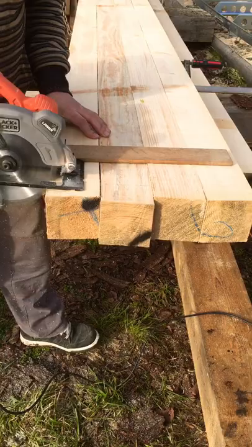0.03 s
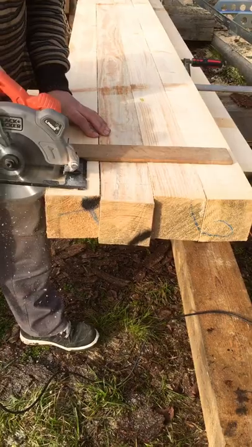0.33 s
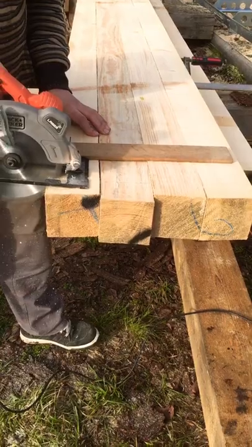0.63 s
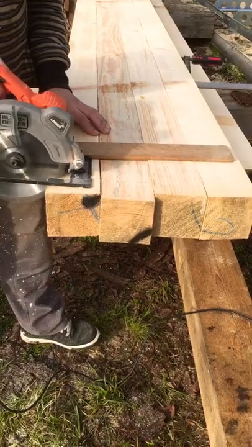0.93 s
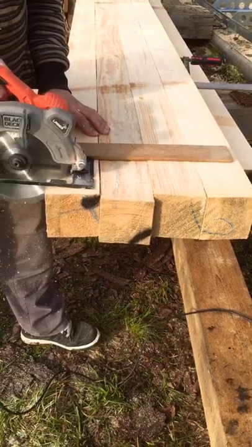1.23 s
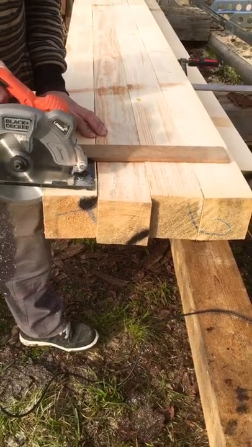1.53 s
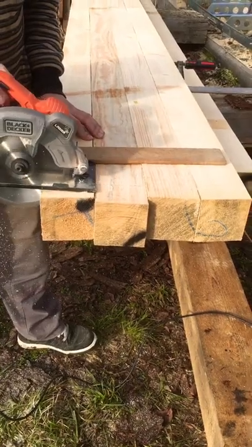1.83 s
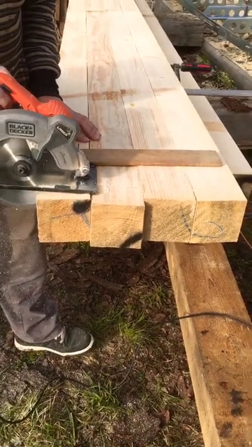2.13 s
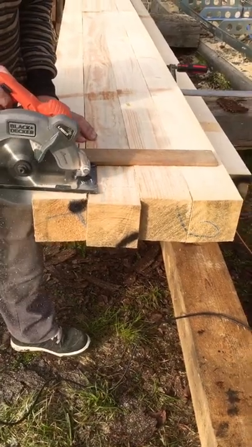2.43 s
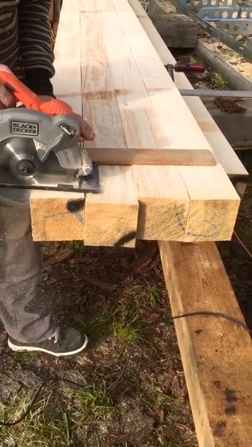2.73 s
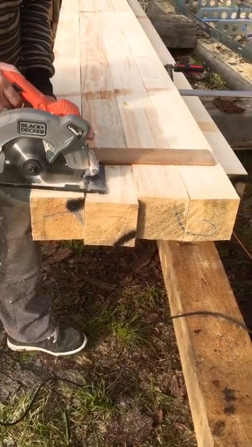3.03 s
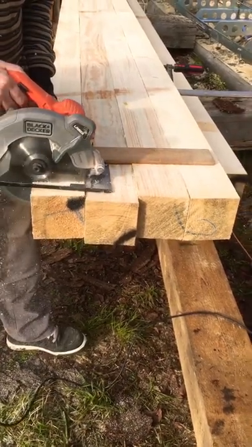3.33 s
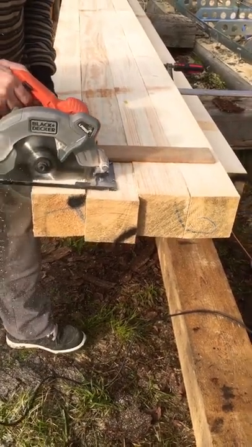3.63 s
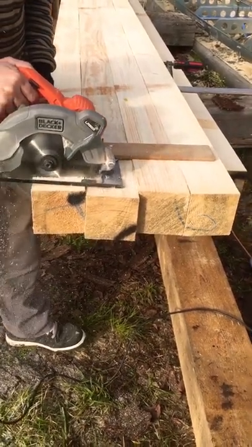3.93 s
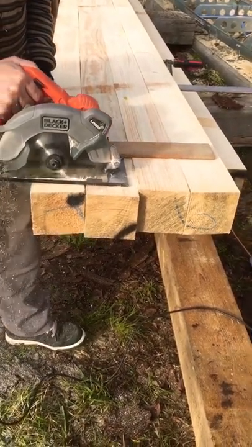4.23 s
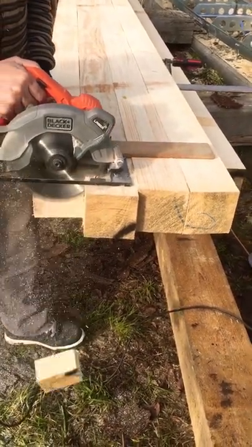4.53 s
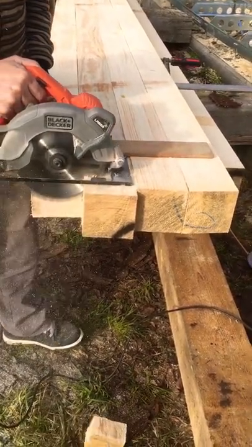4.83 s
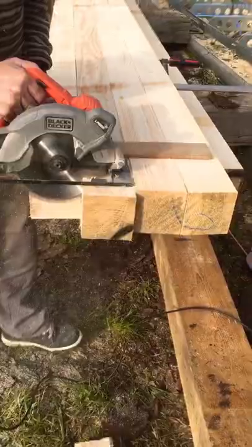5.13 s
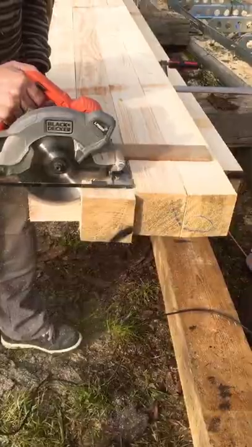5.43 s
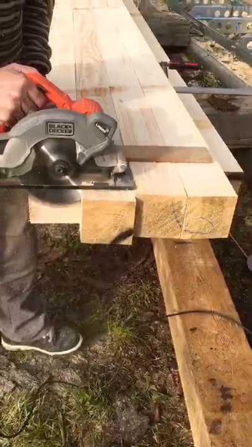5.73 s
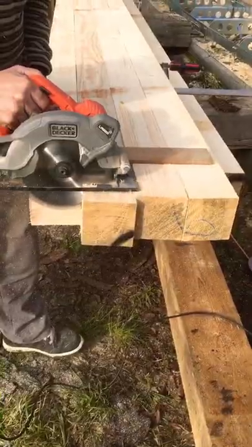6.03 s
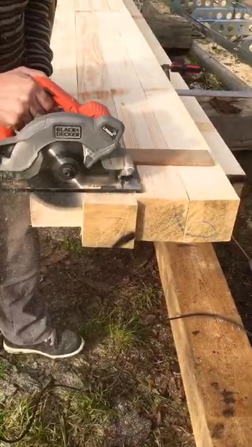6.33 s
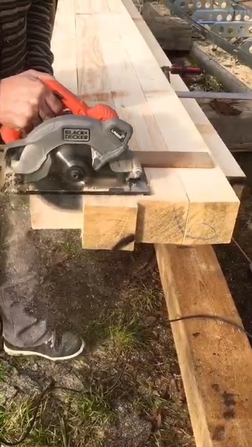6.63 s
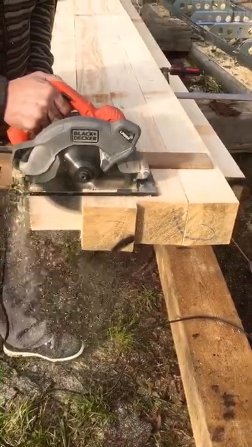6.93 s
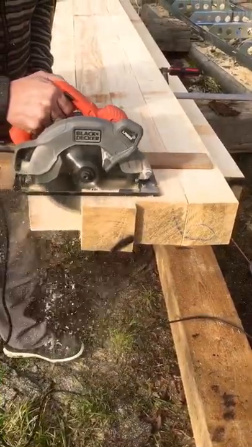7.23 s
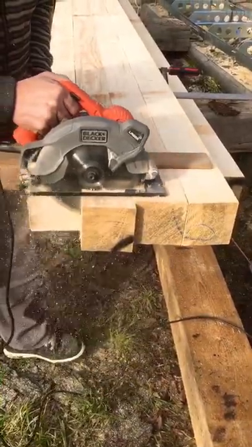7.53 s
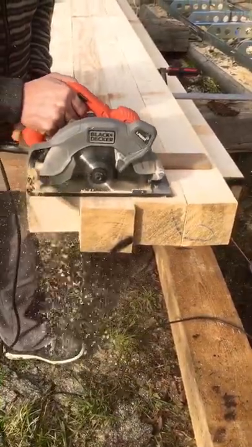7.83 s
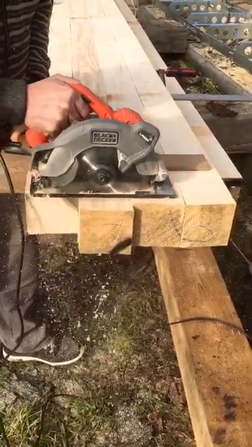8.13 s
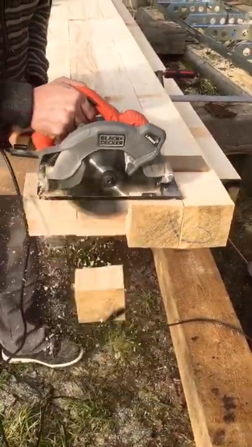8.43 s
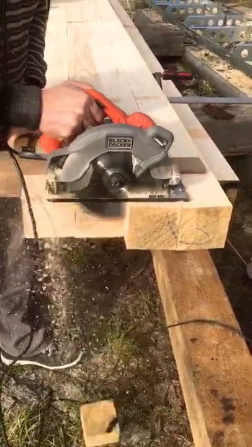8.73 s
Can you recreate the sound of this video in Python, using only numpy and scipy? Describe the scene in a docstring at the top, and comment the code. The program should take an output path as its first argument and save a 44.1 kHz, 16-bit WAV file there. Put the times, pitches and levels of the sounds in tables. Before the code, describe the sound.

A hand-held circular saw cuts in abruptly, already running loudly through wooden beams, outdoors and about an arm's length from the microphone. Its gears whine and its teeth make a throbbing rasp, with shrill ringing overtones, brief squeals and a hiss of sawdust. The pitch slides down over the first two seconds. Around 3 seconds the blade is buried: the motor sags, the teeth chatter and the beams drone roughly with each push. At about 4.6 seconds an offcut lands on soil with a faint, dull thud, and the saw runs lighter and a little higher. From 6.5 seconds it labours again, its pitch dipping and recovering in surges. Very faint wind puffs touch the microphone near 7.5 seconds. A second offcut thuds softly at about 8.7 seconds, with the saw still cutting at the end, around 9 seconds.

```python
"""Outdoors, an arm's length from a hand-held circular saw crossing wooden beams; one mono microphone.
The running saw cuts in abruptly: gears whine, teeth rasp through blade and guard, throbbing once a turn.
The hand feeds it in pushes; by 3 s the blade is buried, the motor sags and the beams drone. An offcut
thuds on the soil at 4.6 s and the blade runs lighter, then labours again from 6.5 s. Faint wind puffs on
the microphone near 7.5 s, and a second offcut drops at 8.7 s with the saw still cutting."""
import sys
import numpy as np
from scipy import signal
from scipy.fft import rfft, irfft, next_fast_len
from scipy.io import wavfile
from scipy.ndimage import uniform_filter1d, map_coordinates

SR = 44100
rng = np.random.default_rng(int(sys.argv[2]) if len(sys.argv) > 2 else 0)


def generate_wav(sig):
    """Save sig (samples, or channels by samples) to the path in sys.argv[1] as 16-bit PCM at SR."""
    pcm = np.round(np.clip(np.atleast_2d(sig).T, -1, 1) * 32767).astype(np.int16)
    wavfile.write(sys.argv[1], SR, pcm)


N = 396018
TIME = np.arange(N) / SR
FFT_SIZE = next_fast_len(N)
FREQ = np.maximum(np.arange(FFT_SIZE // 2 + 1) * SR / FFT_SIZE, 1)

BLADE_TEETH, GEAR_TEETH, PINION_TEETH = 18, 35, 6
FREE_HZ, BURIED_HZ = 73.44, 68.6  # blade speeds at which the wood begins to grip, and grips fully
MAINS_HZ, TOP_HZ = 50, 15750


def undb(db):
    """Decibels to gain."""
    return np.exp(np.asarray(db) * (np.log(10) / 20))


def unit(x):
    """Scale to rms 1."""
    return x / np.sqrt(np.mean(x ** 2))


def curves(table):
    """The columns after a table's time column, interpolated to one value per sample."""
    times, *columns = np.transpose(table)
    return [np.interp(TIME, times, column) for column in columns]


def spell(start, end, attack_s, release_s):
    """Attack, hold and release from 0 to 1, half open at the start and at the end."""
    return np.clip(.5 + np.minimum((TIME - start) / attack_s, (end - TIME) / release_s), 0, 1)


def walk(rate_hz, steps=4):
    """Random levels held for 1 / rate_hz seconds and smoothed twice; spread 1."""
    held = np.repeat(rng.standard_normal(int(TIME[-1] * rate_hz) + 2), steps)
    slewed = unit(uniform_filter1d(uniform_filter1d(held, steps), steps))
    return np.interp(TIME, np.arange(len(slewed)) / (rate_hz * steps), slewed)


def sine(cycles, smear):
    """A sine of rms 1 with a phase disturbance in radians."""
    return np.sqrt(2) * np.sin(2 * np.pi * cycles + smear)


def shape(x, gain):
    """Filter by a gain for each frequency."""
    return irfft(rfft(x, FFT_SIZE) * gain, FFT_SIZE)[:N]


def below(edge_hz, order=8):
    """Gain of a low-pass."""
    return 1 / np.sqrt(1 + (FREQ / edge_hz) ** (2 * order))


def above(edge_hz, order=8):
    """Gain of a high-pass."""
    return 1 / np.sqrt(1 + (edge_hz / FREQ) ** (2 * order))


def resonances(modes, hz):
    """Gain of a set of resonances at the given frequencies."""
    return undb(sum(db / (1 + (2 * (hz - centre) / width) ** 2) for centre, width, db in modes))


def turn_noise(turns, memory, points=512):
    """Noise that partly repeats every turn: each tooth keeps its own bite while the wood changes."""
    fresh = rng.standard_normal((int(TIME[-1] * 100), points))  # one row a turn
    bites = signal.lfilter([1], [1, -memory], fresh, axis=0).ravel()
    return unit(map_coordinates(bites, [(turns + 10) * points], order=3, mode="wrap"))


def line_cluster(lines, speed, turns, modes, waver_db, smear, side_db=0):
    """A tone with sidebands from a once-a-turn wobble; each line wavers in level and phase."""
    tone, power = 0, 0
    carrier, _ = max(lines, key=lambda line: line[1])
    for k, db in lines:
        gain = undb(db + waver_db * walk(7) + side_db * (k != carrier)) * resonances(modes, k * speed)
        tone = tone + gain * sine(k * turns, smear * walk(22))
        power = power + gain ** 2
    return tone / np.sqrt(power)


def wind():
    """Wind on the microphone: a faint rumble with a few soft puffs."""
    # puffs of air: (t/s, level/dB, half-length/s)
    puffs = [(7.37, -51, 0.027), (7.461, -51, .025), (7.617, -59, .025)]
    swell = undb(-76.5) + sum(undb(db) * np.exp(-((TIME - t) / half) ** 2) for t, db, half in puffs)
    return swell * unit(shape(rng.standard_normal(N), above(42, order=4) * below(72, order=3)))


def offcuts():
    """Each block lands on the soil with a dull, quickly damped thud."""
    # landings: (t/s, f/Hz, level/dB, decay/s)
    landings = [(4.639, 140, -33, 0.0084), (8.665, 85.4, -41, 0.019)]
    out = 0
    for t, hz, db, decay in landings:
        age = np.maximum(TIME - t, 0)
        out = out + undb(db) * np.exp(-age / decay) * np.sin(2 * np.pi * hz * age)
    return out


def beams(turns, load, shake_db):
    """The wobbling blade shakes the beams in a rough drone at its lowest harmonics."""
    # drone between pushes: (multiple of blade speed, level/dB, rise when buried/dB)
    harmonics = [(1, -63.5, 1.5), (2, -65.5, 13), (3, -63, 9), (4, -64, 7), (5, -62, 6)]
    drone = sum(undb(db + rise_db * load + 3.3 * walk(12)) * sine(k * turns, .7 * walk(22))
                for k, db, rise_db in harmonics)
    rumble = unit(shape(rng.standard_normal(N), above(176, order=4) * below(270, order=3)))
    return (drone + undb(-61 + 11 * load) * rumble) * undb(shake_db)


def motor(turns, shake_db):
    """The unbalanced shaft hums, less when pressed down; the field hums at twice the mains rate."""
    # shaft hum between pushes: (t/s, level/dB)
    hum = [(0.05, -43.5), (0.47, -37.5), (1.2, -44.5), (2.6, -38.5), (6.3, -42.5), (8.98, -55.5)]
    level_db = curves(hum)[0] - 0.94 * np.maximum(shake_db, 0) + 0.2 * walk(13)
    shaft = undb(level_db) * sine(turns * GEAR_TEETH / PINION_TEETH, smear=0)
    field = undb(-64.5) * sine(2 * MAINS_HZ * TIME, smear=0)
    return shaft + field


def gears(speed, turns):
    """The mesh whines through the gear case; as the motor labours it fades and rattles once a turn."""
    # whine before it fades with the speed: (t/s, relative level/dB)
    whine_levels = [(0.05, -30), (0.52, -13.5), (0.94, -14), (1.06, -20), (1.8, -14.5), (2.15, -18.3),
                    (2.85, -17.5), (4.2, -21), (4.6, -26.5), (5.9, -22.5), (6.08, -18.5), (6.4, -17),
                    (6.9, -21), (7.3, -16.5), (8.45, -19), (8.98, -24)]
    # lines around the gear mesh: (multiple of blade speed, relative level/dB)
    mesh_lines = [(32, -28), (33, -10.5), (34, -5), (35, 6), (36, 3), (37, -33), (38, -37), (39, -26.5)]
    # resonance of the gear case: (f/Hz, width/Hz, gain/dB)
    case_modes = [(2904, 53, 19)]
    strain = np.clip((76 - speed) / 8, .04, .55)  # the rattle's share of the power
    whine = line_cluster(mesh_lines, speed, turns, case_modes, waver_db=2.6, smear=0.25 + 0.5 * strain)
    tight_spot = unit(np.exp(1.5 * np.cos(2 * np.pi * turns)))
    knocks = undb(2.4 * walk(400)) * tight_spot
    rattle = unit(knocks * sine((GEAR_TEETH + 1) * turns, 1.8 * walk(300)))
    fade_db = 1.4 * np.maximum(FREE_HZ - speed, 0)
    level_db = curves(whine_levels)[0] - fade_db + 1.1 * walk(120) - 1.5
    return (np.sqrt(1 - strain) * whine + np.sqrt(strain) * rattle) * undb(level_db)


def overtones(turns, load):
    """Shrill overtones of the teeth slide with the speed, each swelling and fading on its own."""
    # overtones of the lightly running blade: (multiple of blade speed, relative level/dB)
    lines = [(54, -40.5), (72, -35.5), (90, -36.5), (99, -42), (108, -35), (117, -51), (126, -39),
             (135, -45), (144, -39)]
    shrill = sum(undb(db + 3.4 * walk(9)) * sine(k * turns, 1.2 * walk(130)) for k, db in lines)
    throb = 1 + 0.5 * np.cos(2 * np.pi * turns)  # the blade's wobble chops them once a turn
    return shrill * throb * undb(-3.5 - 4.2 * load)


def squeals(speed, turns):
    """Harmonics of the blade sing out as the changing speed slides them through sharp resonances."""
    # harmonic and its resonance: (multiple of blade speed before rounding, f/Hz, width/Hz, level/dB)
    crossings = [(9, 711, 8.2, -29), (19, 1565, 49, -25.5), (27, 2140, 15, -14), (35, 3010, 43, -26.5),
                 (71.3, 5900, 70, -24), (81.2, 6945, 80, -22), (100, 8150, 130, -36)]
    out = 0
    for multiple, hz, width, db in crossings:
        k = round(multiple)
        detune = (k * speed - hz) / width
        response = 1 / (1 + detune ** 2 + np.minimum(1.23 * detune, 0) ** 4)  # steeper on the low side
        out = out + undb(db + 1.7 * walk(109.6)) * response * sine(k * turns, .35 * walk(49.6))
    return out


def ringing_bands(turns, swell_s=0.14):
    """Narrow bands of ringing noise swell and fade; the 758 Hz band adds body to the opening."""
    # bands of ringing noise: (from t/s, to t/s, f/Hz, level/dB)
    bands = [(-.2, 0.37, 3020, -32), (-.2, 0.29, 1560, -23), (-.2, 0.36, 6220, -24), (-.2, .6, 758, -36.5),
             (-.2, 1.9, 8050, -33), (.3, 1.2, 9000, -34), (.45, .98, 1544, -24.5),
             (1.15, 2.15, 5570, -31.5), (1.2, 2.17, 2230, -28.5), (1.9, 3.04, 7860, -29.5),
             (2.85, 4.3, 6940, -28), (2.9, 3.6, 4580, -34), (2.9, 3.95, 5790, -30), (2.9, 6.6, 3440, -35),
             (3.1, 4.33, 2140, -25.5), (3.68, 4.03, 7870, -24.5), (4.08, 4.42, 3540, -24.5),
             (4.6, 6.6, 10900, -30), (4.7, 5.9, 5480, -31.5), (4.7, 6.6, 3174, -32.5),
             (4.8, 6.3, 2145, -35), (5.4, 7.2, 9650, -31), (6.1, 7, 4340, -34), (7.1, 7.6, 8990, -23),
             (7.4, 9.5, 4350, -32.5), (7.4, 9.5, 3710, -32), (8.05, 8.6, 3500, -29),
             (8.05, 10.6, 4270, -27), (8.7, 9.14, 6030, -27.5)]
    force, out = turn_noise(turns, memory=0.853), 0
    for start, end, hz, db in bands:
        width_hz = 65 * np.sqrt(hz / 1000)
        b, a = signal.iirpeak(hz, hz / width_hz, fs=SR)
        band = unit(signal.lfilter(b, a, signal.lfilter(b, a, force)))
        swell = np.clip(np.minimum(TIME - start, end - TIME) / swell_s, 0, 1)
        out = out + undb(db) * swell * band
    return out


def teeth(speed, turns, load):
    """The teeth strike the kerf in a throbbing note, firmer when the wood grips the blade."""
    # lines around the tooth rate: (multiple of blade speed, relative level/dB)
    lines = [(16, -17), (17, -2.5), (18, 4.5), (19, -2), (20, -27)]
    # the teeth catch in the kerf and chatter: (from t/s, to t/s, relative level/dB)
    catches = [(2.794, 3.136, -21), (3.326, 4.08, -23), (4.22, 4.343, -24.5), (4.85, 5.5, -21),
               (5.502, 6.3, -23.5), (6.71, 6.886, -19.5), (7.36, 7.842, -24), (8.184, 8.407, -20.5),
               (8.617, 9.1, -22.3)]
    note = line_cluster(lines, speed, turns + 0.301, modes=[], waver_db=3.5,
                        smear=0.54 - 0.17 * load, side_db=1.5 - 5.3 * load)
    chatter = sum(undb(db) * spell(start, end, attack_s=0.078, release_s=0.09)
                  for start, end, db in catches)
    level = np.hypot(undb(-35), chatter)  # the note carries on softly between catches
    return note * level * undb(2.1 * walk(110) - 3.0)


def cutting(turns, load, bite_db, spray_db, wood_edge_hz=3300, dust_edge_hz=10000):
    """Teeth tear fibres in quick bursts that ring blade and guard; deep wood shifts the resonances."""
    # steady feed, relative levels: (t/s, tearing wood/dB, blade rasp/dB, sawdust hiss/dB)
    feed = [(0.05, -18.8, -18.5, -26.5), (0.9, -20, -20.5, -28), (1.25, -22, -24, -27),
            (2.6, -19.5, -21.7, -26.7), (3.3, -21, -20.5, -21.7), (4.9, -20.5, -17.5, -22),
            (6, -21, -20, -21), (7.9, -21.5, -19.5, -23.5), (8.98, -20, -20, -22.5)]
    # broad colour of the cutting noise: (f/Hz, gain/dB)
    colour_points = [(60, -25), (150, -16.5), (300, -6), (480, -7.5), (700, 3), (1800, 2), (3300, -2),
                     (4000, -2.5), (5000, -2), (9500, 3.5), (12300, 6.5), (15500, 14)]
    # resonances of blade and guard, lightly loaded: (f/Hz, width/Hz, gain/dB)
    light_modes = [(1270, 265, 7.5), (1546, 76, 7.5), (2107, 250, 6.5), (2895, 375, 12), (3720, 880, 8),
                   (4392, 570, 17), (4656, 62, 15), (5035, 155, 16), (5380, 240, 17.5), (5760, 240, 15.5),
                   (6125, 440, 15.5), (6820, 610, 17), (7280, 62, 17.5), (7933, 580, 20), (8740, 107, 18.5),
                   (9050, 300, 13), (9596, 530, 15.5), (10690, 290, 10.5), (11140, 140, 15.5),
                   (11620, 150, 12), (12500, 460, 7), (13360, 540, 8)]
    # the same, buried in the wood: (f/Hz, width/Hz, gain/dB)
    buried_modes = [(593, 120, 6.2), (1054, 33, 9.4), (1326, 470, 11.1), (2135, 660, 8.9), (2760, 490, 8.5),
                    (3560, 860, 14), (4270, 150, 15.4), (4600, 176, 16.5), (5020, 230, 9.4),
                    (5586, 520, 16.5), (6000, 88, 15), (6440, 490, 11), (7000, 440, 10.8), (7734, 260, 15),
                    (8100, 220, 11.4), (8760, 680, 11.3), (9660, 540, 11.9), (10670, 130, 9.9),
                    (11220, 350, 6.5), (11580, 190, 9.7), (12624, 90, 5.2), (13100, 650, 5.7)]
    hz, db = np.transpose(colour_points)
    colour = undb(np.interp(np.log(FREQ), np.log(hz), db))
    light, buried = colour * resonances(light_modes, FREQ), colour * resonances(buried_modes, FREQ)

    def ring(force, band):
        """One band of the force through the resonances of the present depth."""
        return (1 - load) * unit(shape(force, light * band)) + load * unit(shape(force, buried * band))

    bursts = 1 + 0.27 * np.cos(2 * np.pi * BLADE_TEETH * turns)
    scrape = load * turn_noise(turns, memory=0.39) + (1 - load) * turn_noise(turns, memory=0.59)
    scrape = scrape / np.hypot(load, 1 - load) * bursts * undb(1.22 * walk(400))
    tearing = turn_noise(turns, memory=0.25)  # fibres break far less regularly than the steel rubs
    wobble_db = 0.75 * np.cos(2 * np.pi * turns)  # the blade presses on the kerf once a turn
    torque_db = 0.84 * np.sin(2 * np.pi * 2 * MAINS_HZ * TIME)  # the motor pulses with the mains
    tearing = tearing * undb(wobble_db + torque_db + walk(150))
    wood_db, rasp_db, dust_db = curves(feed)
    wood = ring(tearing, below(wood_edge_hz)) * undb(wood_db + 0.38 * bite_db)
    rasp = ring(scrape, above(wood_edge_hz) * below(dust_edge_hz)) * undb(rasp_db + bite_db - 2.94)
    dust = ring(scrape, above(dust_edge_hz) * below(TOP_HZ)) * undb(dust_db + spray_db - 1.65)
    grain = walk(16)  # hard and soft growth rings make the cut flutter
    return (wood + rasp * undb(0.76 * grain) + dust * undb(.3 * grain)) * undb(0.64 * walk(30))


def pushes():
    """What the hand's pushes add to rasp, sawdust and drone, in dB."""
    # the hand pushes (+) or eases off (-): (from t/s, to t/s, rasp/dB, sawdust/dB, drone/dB)
    strokes = [(0, .22, 2.5, -2, 1), (0.397, 0.558, 1.5, 5.5, 0), (2.05, 2.78, 1, 1, 3.5),
               (2.79, 2.956, 7, 4.5, 10.5), (2.998, 3.117, 2.5, 0.5, 9.5), (3.5, 3.617, -2, -5, 1),
               (3.661, 3.857, 3, 4.5, 4.5), (4.17, 4.337, 4, 4.5, 5), (4.41, 4.567, -2, -3.5, -6),
               (5.3, 5.385, 3.5, 1, -2), (6.214, 6.305, 2.5, 4, 2), (6.478, 6.67, 3, 3, 6),
               (6.655, 6.905, 1.5, 1, 5), (6.98, 7.137, -4, -2, -7), (7.35, 7.548, 1, 4.5, 3.5),
               (7.55, 7.78, 1, 1, 4.5), (8.118, 8.353, 2, -0.5, 3), (8.42, 9.1, 1, 3, 6.5)]
    return sum(np.outer(gains_db, spell(start, end, attack_s=.09, release_s=.06))
               for start, end, *gains_db in strokes)


def scene():
    """Blade speed and the hand's pushes drive the saw, over offcuts and wind; both channels alike."""
    # turns of the blade per second: (t/s, f/Hz)
    blade_speeds = [(0, 87), (1, 79.5), (2.15, 73.1), (2.72, 72.7), (3.08, 64), (3.45, 64), (3.65, 65.7),
                    (3.85, 63.6), (4.3, 66.9), (4.5, 71.6), (4.75, 74.2), (5.55, 76), (6.2, 75.6),
                    (6.5, 72.7), (6.78, 66.8), (6.95, 66.7), (7.15, 70.5), (7.38, 70.9), (7.7, 66.8),
                    (8.15, 69.8), (8.55, 69.6), (8.98, 65.3)]
    speed = uniform_filter1d(curves(blade_speeds)[0], SR // 10, mode="nearest")
    turns = np.cumsum(speed * (1 + 0.0017 * walk(25))) / SR
    load = np.clip((FREE_HZ - speed) / (FREE_HZ - BURIED_HZ), 0, 1)  # a slow blade is a buried blade
    bite_db, spray_db, shake_db = pushes()
    drive = motor(turns, shake_db) + gears(speed, turns)
    blade = teeth(speed, turns, load) + overtones(turns, load)
    ringing = squeals(speed, turns) + ringing_bands(turns)
    cut = cutting(turns, load, bite_db, spray_db)
    background = beams(turns, load, shake_db) + offcuts() + wind()
    return np.tile(background + drive + blade + ringing + cut, (2, 1))


def record(dry):
    """After a brief silence the running saw cuts in abruptly; peaks are clipped and the top is cut."""
    silence_s = .036
    heard = np.clip(dry * (TIME > silence_s), -.95, .95)
    return signal.sosfilt(signal.ellip(12, .1, 80, TOP_HZ, fs=SR, output="sos"), heard)


dry = scene()
out = record(dry)
generate_wav(out)
```